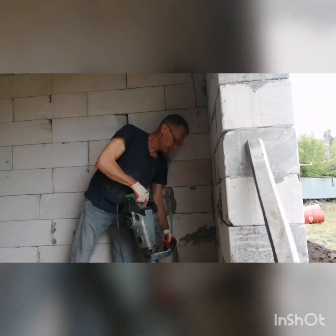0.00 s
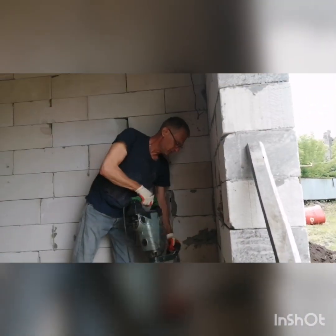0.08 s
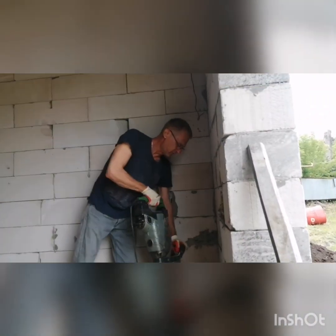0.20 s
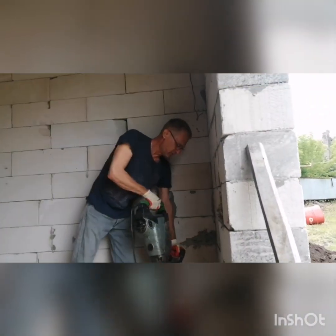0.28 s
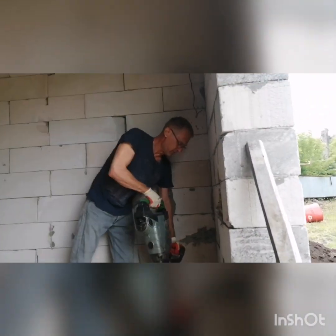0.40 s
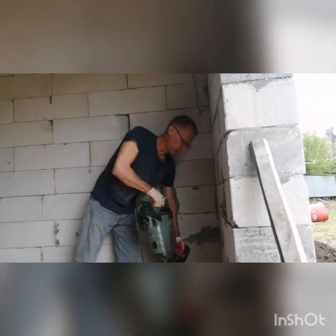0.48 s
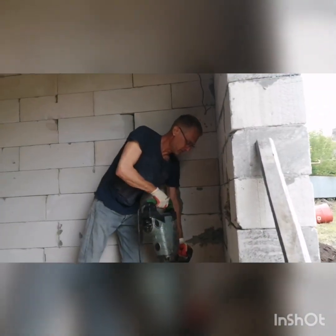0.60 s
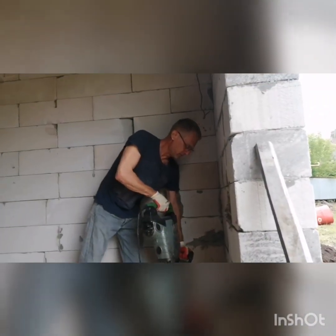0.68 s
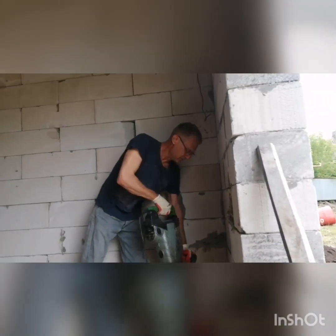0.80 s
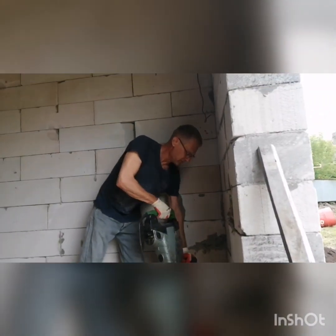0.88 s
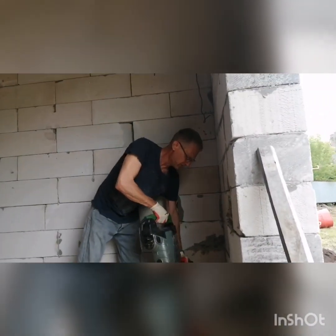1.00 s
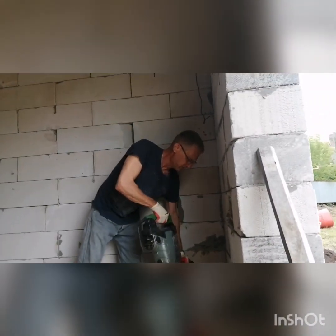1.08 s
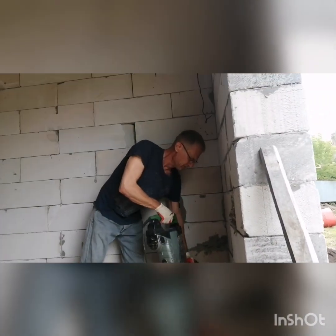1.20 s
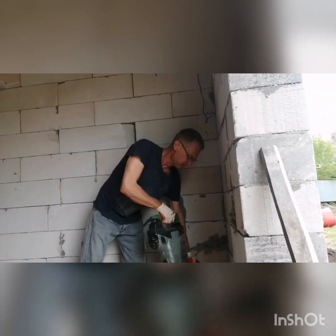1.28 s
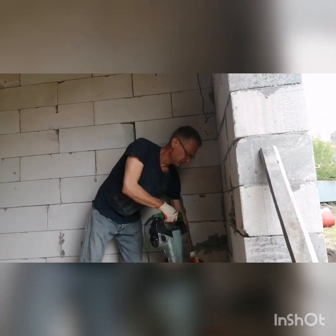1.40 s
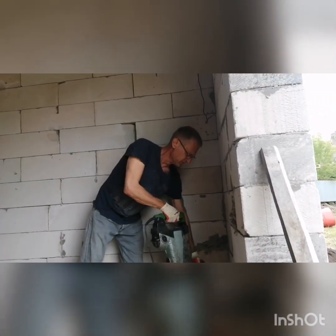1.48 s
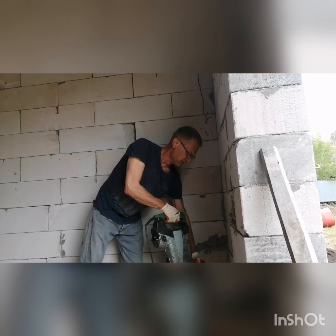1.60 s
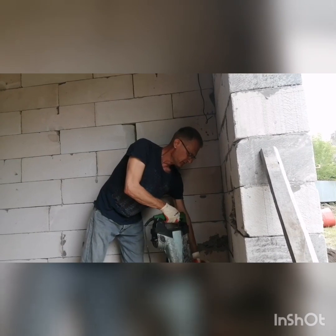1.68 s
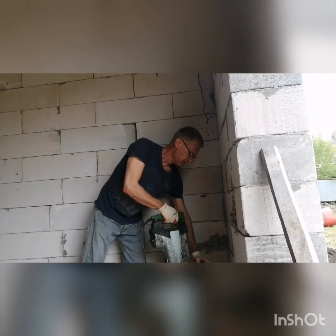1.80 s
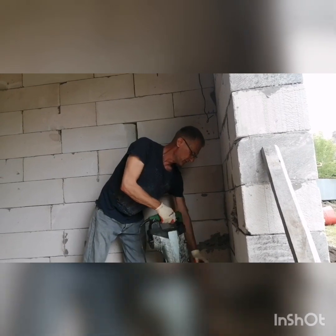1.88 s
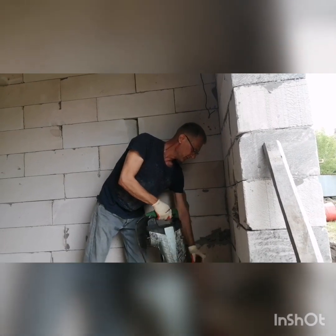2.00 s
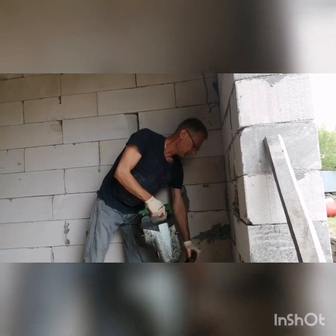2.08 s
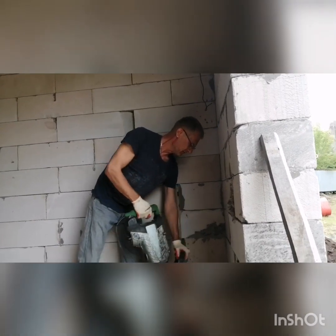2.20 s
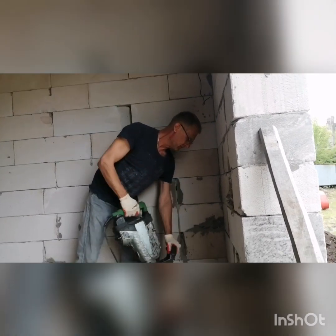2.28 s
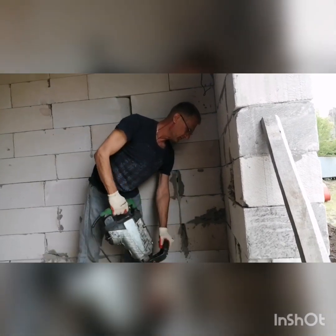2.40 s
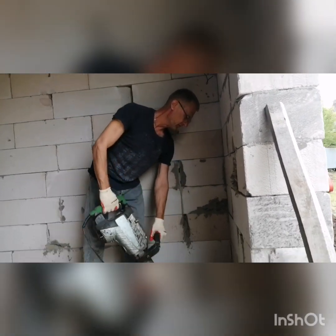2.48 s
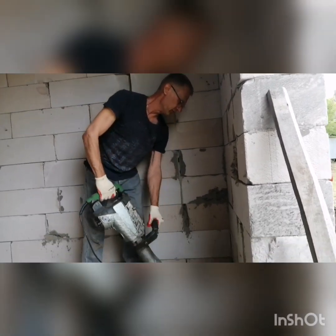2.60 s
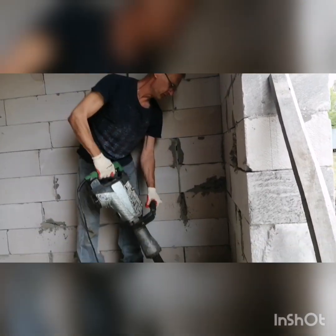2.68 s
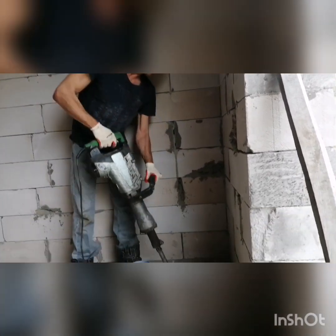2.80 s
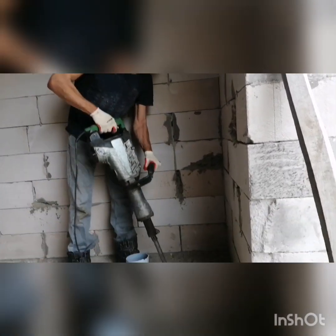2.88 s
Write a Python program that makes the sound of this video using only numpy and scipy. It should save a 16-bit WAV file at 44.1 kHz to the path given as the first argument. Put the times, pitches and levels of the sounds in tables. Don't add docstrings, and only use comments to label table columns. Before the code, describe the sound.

Electric demolition hammer in a bare block room. Near silence, then a faint motor start and rough rising whine at 0.2-0.35 s. From 0.34 s, about 21 heavy blows a second crack concrete, thud the slab and ring the steel chisel. After 1 s the blows are lighter, drier, clicky. From 1.85 s they slow; last rattles at 2.65-2.9 s. Short diffuse echo, treble stronger on the right.

```python
import sys
import numpy as np
from scipy import signal
from scipy.fft import rfft, irfft
from scipy.io import wavfile

SR = 44100
rng = np.random.default_rng(int(sys.argv[2]) if len(sys.argv) > 2 else 0)


def boost(x):
    u = np.asarray(x, float) / 20
    return 10 ** u


def wrap_up_sound(samples):
    columns = np.atleast_2d(samples).T
    tamed = np.clip(columns, -1, 1)
    steps = np.round(tamed * 32767).astype(np.int16)
    wavfile.write(sys.argv[1], SR, steps)


N = 132300


def rms_one(x):
    return x / np.sqrt(np.mean(x ** 2) + 1e-20)


def in_time(rows):
    s, *columns = np.transpose(rows)
    return [np.interp(np.arange(N) / SR, s, c) for c in columns]


def at_hz(points, hz):
    table_hz, value = np.transpose(points)
    return np.interp(np.log(np.maximum(hz, 1)), np.log(table_hz), value)


def colour(x, points, share=1):
    size = x.shape[-1]
    gain = boost(share * at_hz(points, np.fft.rfftfreq(size, 1 / SR)))
    return irfft(rfft(x) * gain, size)


def drift(rate_hz):
    r = np.exp(-2 * np.pi * rate_hz / SR)
    white = rng.standard_normal(N + SR)
    return rms_one(signal.lfilter([1], [1, -2 * r, r * r], white)[SR:])


def band(x, order, low_hz, high_hz):
    return signal.sosfilt(signal.butter(order, [low_hz, high_hz], "band", fs=SR, output="sos"), x)


# f/Hz, correlation/1
PORT_LIKENESS = [(60, 1), (200, 0.94), (700, 0.9), (1500, 0.41), (5000, 0), (12000, 0.07)]


def correlate(mid, side, alike):
    return np.sqrt(1 + alike) * mid + np.sqrt(1 - alike) * side * [[1], [-1]]


def noise(spectrum):
    hz = np.fft.rfftfreq(N, 1 / SR)
    mid, side = rfft(rng.standard_normal((2, N))) * boost(at_hz(spectrum, hz))
    alike = np.clip(at_hz(PORT_LIKENESS, hz), 0, 1)
    return rms_one(irfft(correlate(mid, side, alike), N))


def bursts(s, db, hold_s, fade_s):
    rise_s = 0.00098
    t = np.arange(SR // 4) / SR
    marks = np.zeros(N)
    marks[(s * SR).astype(int)] = boost(db)
    shape = np.exp(-np.maximum(t - hold_s, 0) / fade_s) * (1 - np.exp(-t / rise_s))
    return signal.fftconvolve(marks, shape)[:N]


# t/s, whirr level/dB, casing rumble level/dB
MOTOR = [(0, -47, -81), (.09, -46.5, -72), (.2, -48, -70), (.225, -36.5, -83), (.27, -38, -77),
         (.33, -38, -78), (.55, -42.5, -48.5), (.78, -40, -62), (.98, -44.5, -54.5), (1.7, -48, -53.5),
         (1.95, -50.5, -56.5), (2.4, -51.5, -58), (2.62, -58, -71.5), (2.85, -61.5, -88.5),
         (2.94, -68, -78), (3, -54, -87)]
# f/Hz, density level/dB per Hz
WHIRR = [(250, 2), (500, 1), (1150, -4.5), (2300, 7.5), (3800, 0.5), (5700, 3), (8500, -15), (14000, -18.5)]
# f/Hz, density level/dB per Hz
RUMBLE = [(90, -14), (190, -1.5), (330, 0), (450, -10), (650, -33.5), (1200, -31)]
# t/s, gear f/Hz, gear level/dB, casing ring level/dB
SPIN_UP = [
    (.04, 2300, -62, -66),
    (.1, 2350, -50, -47),
    (.2, 1750, -64, -66),
    (.225, 1850, -46, -44),
    (.27, 2000, -40, -46),
    (.3, 2300, -34, -43),
    (.345, 2450, -34, -50),
    (.37, 2500, -99, -99),
]


def motor():
    whirr_gain_db, rumble_gain_db, grit_db = 2, 6.5, 2
    whine_width_hz, casing_hz = 40, 1150
    whirr_db, rumble_db = in_time(MOTOR)
    whirr = noise(WHIRR) * boost(whirr_db + whirr_gain_db + grit_db * drift(18))
    rumble_level = boost(rumble_db + rumble_gain_db + grit_db * drift(30))
    rumble = noise(RUMBLE + [(2500, -42)]) * rumble_level
    mesh_hz, gear_db, casing_db = in_time(SPIN_UP)
    gear_phase = 2 * np.pi * np.cumsum(mesh_hz + 2 * whine_width_hz * drift(135)) / SR
    gear = (1 + drift(2 * whine_width_hz) / 2) * np.sin(gear_phase) * boost(gear_db)
    casing_tone = np.sin(2 * np.pi * casing_hz * np.arange(N) / SR)
    casing = (1 + drift(2 * whine_width_hz)) * casing_tone * boost(casing_db)
    return whirr + rumble + gear + casing


# f/Hz, T60/s
ROOM_T60 = [(200, 0.6), (1500, 0.25), (6000, 0.31), (14000, 0.18)]


def room(x):
    level_db, delay_s = 1, 0.0058
    t = np.arange(SR * 3 // 4) / SR
    white, tail = rng.standard_normal((2, len(t))), 0
    edges = 40 * 2. ** np.arange(0, 9)
    for low, high in zip(edges, np.append(edges[1:], .45 * SR)):
        mid, side = band(white, 2, low, high)
        hz = np.sqrt(low * high)
        alike = np.clip(at_hz(PORT_LIKENESS, hz), 0, 1)
        t60 = at_hz(ROOM_T60, hz)
        decay = boost(-60 * t / t60) * np.sqrt(np.log(1000) / t60 / SR)
        tail = tail + correlate(mid, side, alike) * decay
    tail = tail * np.clip(t / delay_s - 1, 0, 1)
    return boost(level_db) * signal.fftconvolve(x[None], tail, axes=1)[:, :N]


# t/s, level/dB, left minus right level/dB
PUFFS = [(0.365, -47, -5), (.512, -42.5, 3), (0.655, -51, -11), (.7, -53, 7), (0.802, -52, -17),
         (0.851, -48, -9), (1.001, -56, -12), (1.125, -50.5, -18), (1.33, -62, 5), (1.409, -50, -10),
         (1.612, -52, -8), (1.804, -56, -12), (1.86, -56, -7)]


def puffs():
    length_s, top_hz, air_db = 0.0024, 140, -62.5
    s, db, side_db = np.transpose(PUFFS)
    lumps = []
    for port in range(2):
        port_db = db + 16.5 + side_db * (.5 - port)
        lumps.append(bursts(s - length_s * port, port_db, length_s, length_s / 2))
    rumble_db = in_time(MOTOR)[1]
    air = boost(air_db + 0.61 * (rumble_db + 66.5)) * np.array([drift(300), drift(170)])
    low_band = signal.butter(1, [24, top_hz], "band", fs=SR, output="sos")
    return signal.sosfiltfilt(low_band, np.array(lumps) * [[-1], [1]] + air)


# t/s, f/Hz, level/dB, T60/s
GLINTS = [(.309, 6600, -27, 0.06), (0.312, 2700, -27, .03), (.337, 216, -22.5, 0.051),
          (.34, 2895, -20.5, 0.042), (0.363, 2344, -13, 0.027), (.363, 6780, -14, 0.05),
          (0.368, 4380, -25, 0.082), (.418, 2370, -41, 0.066), (0.657, 4350, -28.5, 0.13),
          (.99, 5350, -63, .05), (1.04, 4350, -29, 0.074), (1.12, 3000, -38, 0.063),
          (1.315, 3240, -38, 0.042), (1.317, 4360, -42, .05), (1.362, 2220, -42, 0.044),
          (1.457, 2820, -44, .05), (1.503, 2120, -32, 0.029), (1.563, 3170, -32, 0.045),
          (1.6, 4410, -37, 0.13), (1.602, 2140, -34, 0.055), (1.651, 5320, -29, .05),
          (1.655, 4350, -37, 0.13), (1.66, 9540, -33.5, 0.13), (1.697, 2130, -38, 0.071),
          (1.705, 4350, -38, 0.13), (1.746, 5480, -27, .05), (1.797, 5350, -30, 0.044),
          (1.856, 5620, -29, 0.039), (1.928, 12970, -35.5, 0.15), (1.995, 2070, -38, 0.032),
          (1.996, 5400, -31, 0.045), (2.077, 2030, -29.5, 0.055), (2.179, 2070, -40.5, 0.29),
          (2.3, 2693, -31.5, 0.053), (2.312, 4550, -34.5, 0.13), (2.467, 4590, -32, 0.059),
          (2.468, 2950, -37.5, 0.055), (2.645, 4330, -51.5, 0.17), (2.674, 626, -47.5, 0.054),
          (2.678, 1700, -49, .04), (2.678, 2850, -48, 0.046), (2.697, 2405, -33.5, 0.074),
          (2.697, 4270, -36, .05), (2.704, 4900, -43, 0.12), (2.704, 9470, -48, .12),
          (2.72, 4500, -53, 0.43)]


def glints():
    rough_db, wander_rad, swell_s = 4.0, .9, 0.0012
    t = np.arange(SR // 3) / SR
    out = np.zeros(N + SR)
    wander = wander_rad * np.tile(drift(79), 2)
    for s, hz, db, t60 in GLINTS:
        i = int(s * SR)
        tone = np.sin(2 * np.pi * hz * t + wander[i:i + len(t)])
        out[i:][:len(t)] += boost(db - 60 * t / t60) * np.minimum(t / swell_s, 1) * tone
    return out[:N] * boost(rough_db * drift(150)) * [[.5], [1]]


def modes(table, s, db, spread_db, chatter_db):
    chatter_s = .022
    out, luck = np.zeros((2, N)), rng.standard_normal((len(s), len(table), 3))
    ragged = noise([(20, 0), (20000, 0)]) / np.sqrt(chatter_s * SR / 2)
    for k, (hz, level_db, t60) in enumerate(table):
        each_db = db + level_db + spread_db * luck[:, k, 0]
        force = np.roll(ragged, 997 * k, axis=1) * bursts(s, each_db + chatter_db, 0, chatter_s)
        same = np.where(luck[:, k, 2] < 2 * at_hz(PORT_LIKENESS, hz), 1, -1)
        strike = boost(each_db) * np.sign(luck[:, k, 1])
        force[:, (s * SR).astype(int)] += strike * [np.ones(len(s)), same]
        r, w = boost(-60 / (t60 * SR)), 2 * np.pi * hz / SR
        out += signal.lfilter([0, np.sin(w)], [1, -2 * r * np.cos(w), r * r], force + 1e-18)
    return out


# t/s, crack level/dB, floor thud level/dB, steel ring level/dB
BITING = [(0.3397, -14, -28.5, -33), (0.3621, -7.5, -36.5, -19.5), (0.414, -12.5, -33.5, -23),
          (0.4574, -9.5, -27, -26), (0.5087, -10.5, -26, -24), (0.5576, -9, -29.5, -29),
          (0.6027, -6.5, -27, -26.5), (0.6503, -16, -25, -24.5), (0.6988, -9, -25.5, -47),
          (0.747, -17.5, -26.5, -28), (0.7968, -13.5, -30, -18), (0.8436, -12, -32, -21.5),
          (0.8933, -11, -34, -36), (0.9399, -12, -43, -26.5)]
# t/s, crack level/dB, floor thud level/dB, steel ring level/dB
FREE = [(0.9893, -11.5, -60, -24), (1.0302, -15, -39, -30.5), (1.075, -13.5, -40, -32),
        (1.1212, -12, -38.5, -24.5), (1.169, -13, -51, -33), (1.2164, -13, -38, -29.5),
        (1.2674, -11.5, -35, -31), (1.316, -14, -40, -26.5), (1.3625, -13.5, -42.5, -28),
        (1.406, -13.5, -45.5, -25), (1.4577, -12.5, -45, -34), (1.512, -12.5, -50.5, -23.5),
        (1.5538, -12.5, -40, -36), (1.6085, -11, -42, -30.5), (1.6572, -15, -44, -24.5),
        (1.704, -14, -42, -29), (1.7491, -14, -43, -24), (1.7998, -14, -48, -25.5)]
# t/s, crack level/dB, floor thud level/dB, steel ring level/dB
COASTING = [(1.8567, -14, -76, -28.5), (1.924, -15.5, -50, -27), (1.996, -16, -67, -25),
            (2.0798, -14, -44.5, -26.5), (2.1772, -15, -40.5, -31), (2.3009, -17, -39, -34.5),
            (2.4661, -21.5, -48, -38.5), (2.643, -51, -61, -47), (2.658, -55, -59, -44.5),
            (2.6963, -22, -59, -24.5), (2.748, -35, -103, -73), (2.9165, -39, -57.5, -57)]
# f/Hz, density level/dB per Hz
CRACK = [(600, -22), (2900, -15), (5000, -8), (7000, -8.5), (8300, -19.5), (11000, -21), (13000, -16),
         (16000, -19)]
# f/Hz, density level/dB per Hz
SPLIT = [(90, -38), (220, 6), (450, 1.5), (1150, -2), (1600, -3.5), (2200, 6), (3000, 10), (3900, -15.5)]
# f/Hz, level/dB, T60/s
STEEL = [(6520, -11, .03), (6655, -1, .07), (6785, 0, .075), (6900, -8, .04), (7060, -12, .03)]
# f/Hz, level/dB, T60/s
HOLDER = [(4450, -25, .04), (5400, -27, .025), (9480, -30, .045), (12650, -28, .025), (13100, -29, .03),
          (14130, -29, .05)]
# f/Hz, level/dB, T60/s
SLAB = [(253.4, -9, 0.044), (371.4, -3, 0.044), (485, -8, 0.028), (629, -7.5, 0.053), (800, -7.5, 0.025),
        (1116, 0.5, 0.011)]
# f/Hz, density level/dB per Hz
ROAR = [(120, -6), (220, -4.5), (400, -0.5), (750, -5), (1250, -3.5), (1700, -23)]


def hammer():
    s, crack_db, thud_db, ring_db = np.transpose(BITING + FREE + COASTING)
    crack_db = crack_db - 16.5
    snap = bursts(s - .0015, crack_db, 0.0022, 0.0095)
    debris = bursts(s, crack_db - 19, 0, 0.056)
    crack = noise(CRACK) * boost(2 * drift(190)) * (snap + debris)
    split = noise(SPLIT) * bursts(s - .001, thud_db + 7, 0.0014, 0.0045)
    steel = modes(STEEL, s + .001, ring_db + 1, spread_db=4.5, chatter_db=-11)
    steel = band(steel, 2, 6000, 7600)
    holder = modes(HOLDER, s + .004, crack_db + 11, spread_db=4.0, chatter_db=0)
    slab = modes(SLAB, s - .002, thud_db - 1.5, spread_db=-0.5, chatter_db=-4.0)
    roar = noise(ROAR) * bursts(s, thud_db - 8, 0, 0.034)
    return roar + crack + split + steel + holder + slab


def ports(x, side):
    return np.array([colour(x[0], side, .5), colour(x[1], side, -.5)])


# t/s, left minus right treble level/dB
AIM = [
    (.12, -19),
    (.35, -5),
    (1, -8.5),
    (1.9, -14),
    (2.5, -15),
    (2.7, -10),
]
# f/Hz, left minus right level/dB
DIRECT_SIDE = [(400, 1.5), (1500, 2.5), (7000, 5.5), (13000, -3)]
# f/Hz, left minus right level/dB
ROOM_SIDE = [(400, 8), (5000, -2.5), (13000, 1)]


def scene():
    tool = motor() + glints() + hammer()
    tool = signal.sosfilt(signal.butter(3, 140, "high", fs=SR, output="sos"), tool)
    heard = ports(tool, DIRECT_SIDE) + ports(room(tool[1]), ROOM_SIDE)
    aim_from_hz = 840
    bass = signal.sosfiltfilt(signal.butter(1, aim_from_hz, fs=SR, output="sos"), heard)
    aim_db, = in_time(AIM)
    return bass + (heard - bass) * boost(aim_db * [[.5], [-.5]]) + puffs()


def low_pass(x):
    return signal.sosfilt(signal.butter(12, 16470, fs=SR, output="sos"), x)


def record(dry):
    notch_hz, notch_width_hz, notch_share, top_hz = 3876, 644, 0.56, 15100
    notched = signal.lfilter(*signal.iirnotch(notch_hz, notch_hz / notch_width_hz, SR), dry)
    dipped = notch_share * notched + (1 - notch_share) * dry
    mix = signal.sosfilt(signal.cheby1(10, 1, top_hz, fs=SR, output="sos"), dipped)
    return low_pass(mix)


dry = scene()
out = record(dry)
wrap_up_sound(out)
```